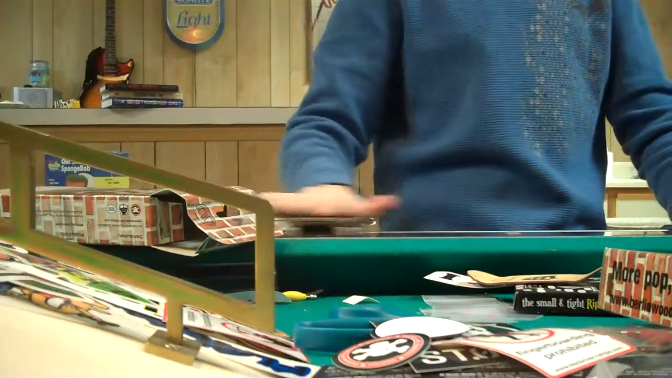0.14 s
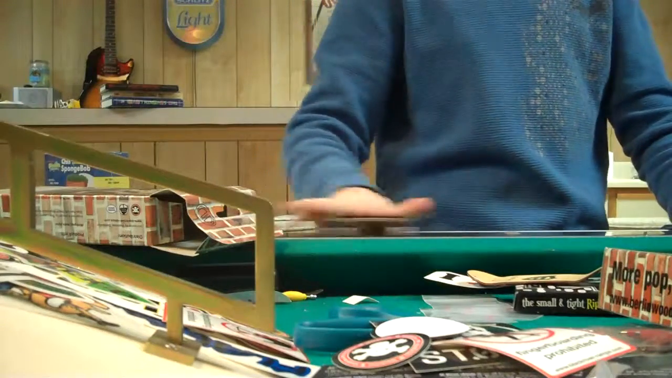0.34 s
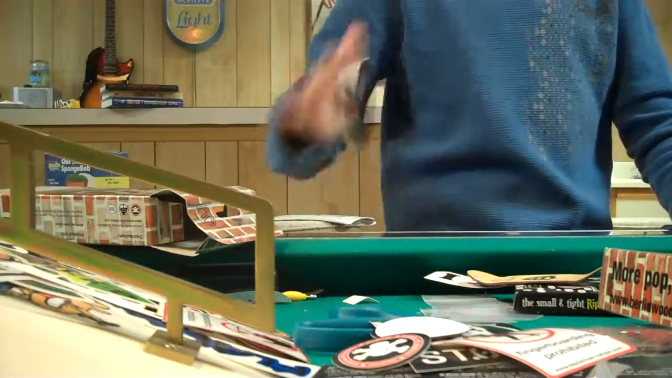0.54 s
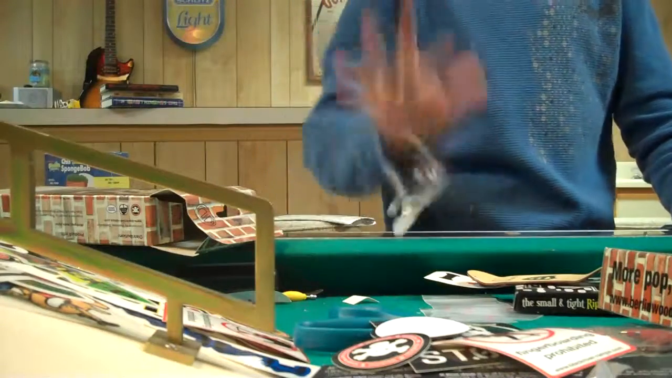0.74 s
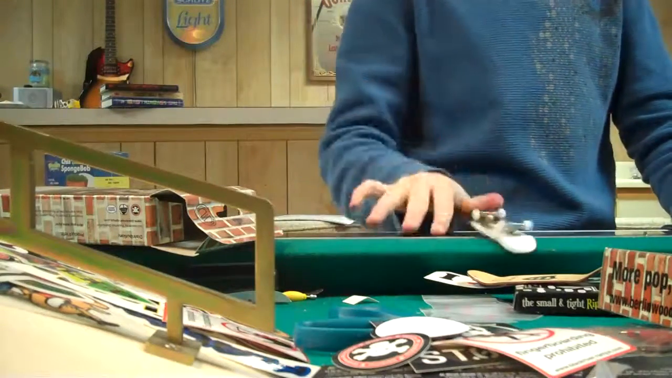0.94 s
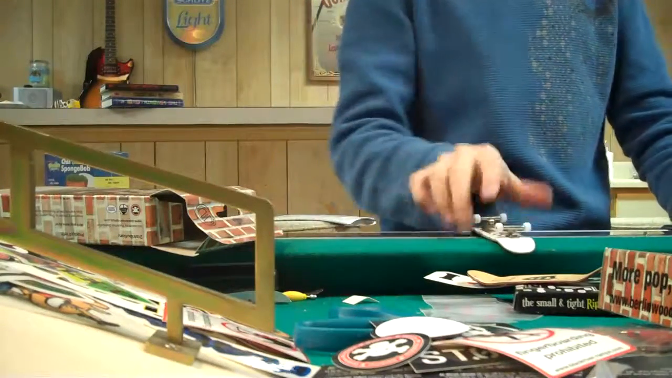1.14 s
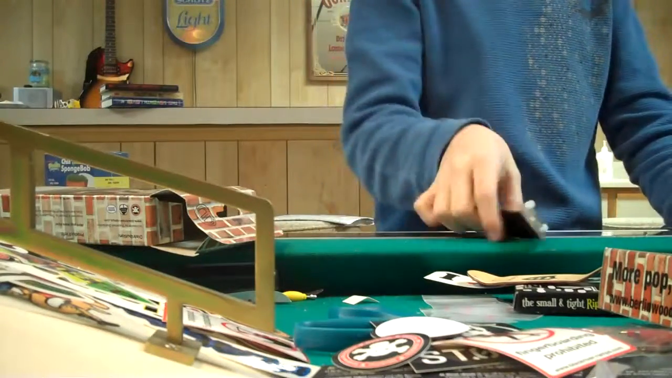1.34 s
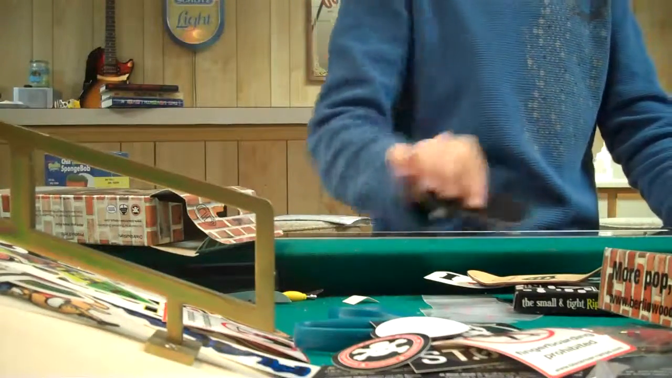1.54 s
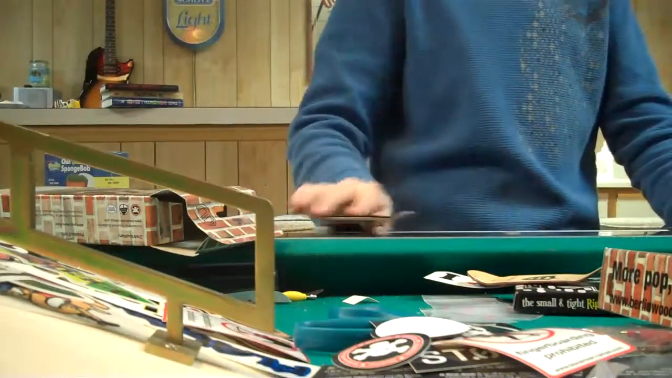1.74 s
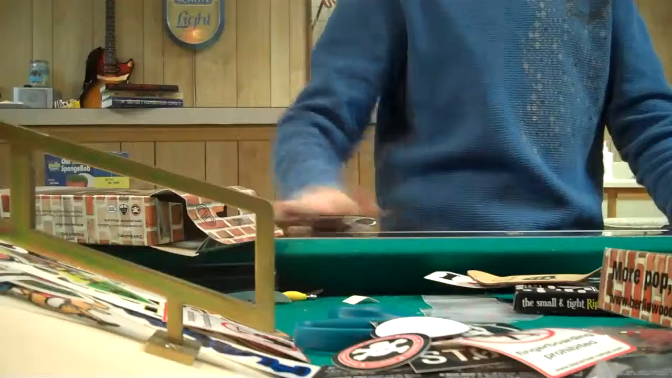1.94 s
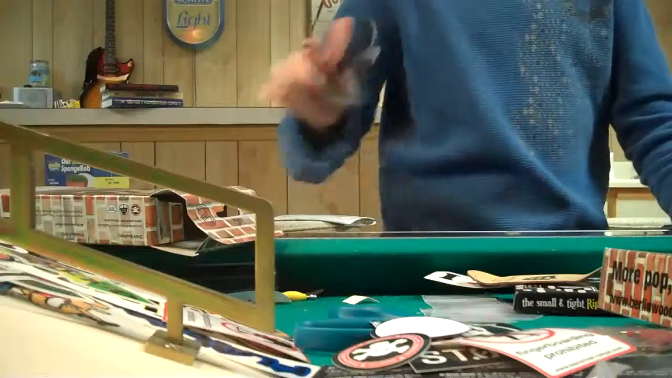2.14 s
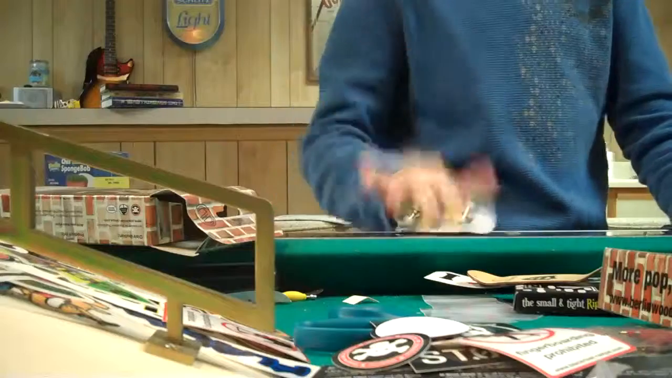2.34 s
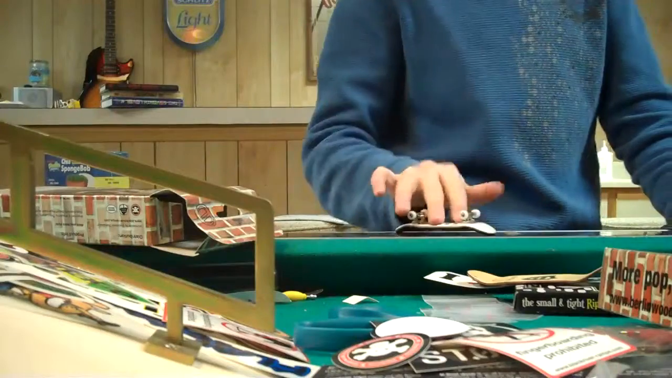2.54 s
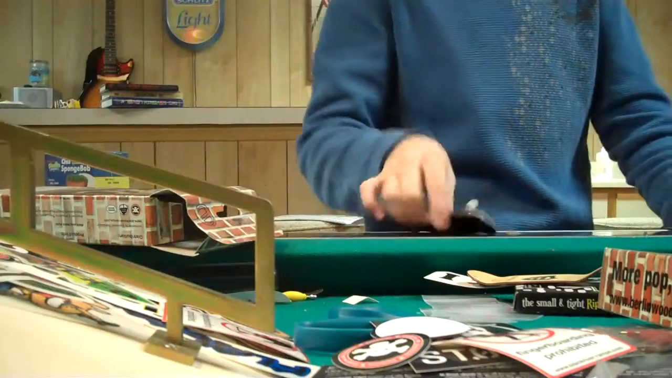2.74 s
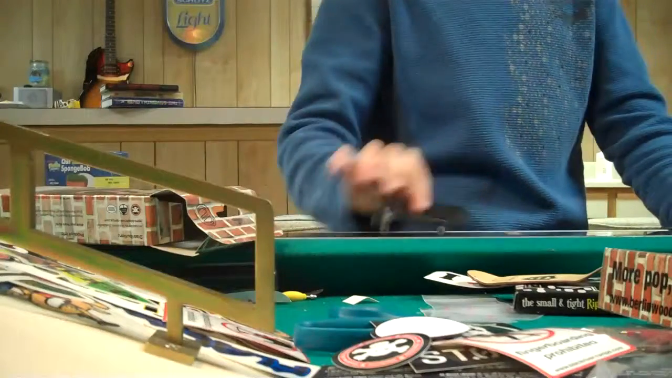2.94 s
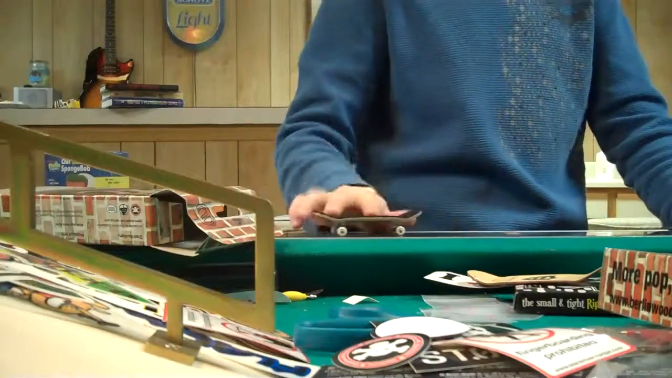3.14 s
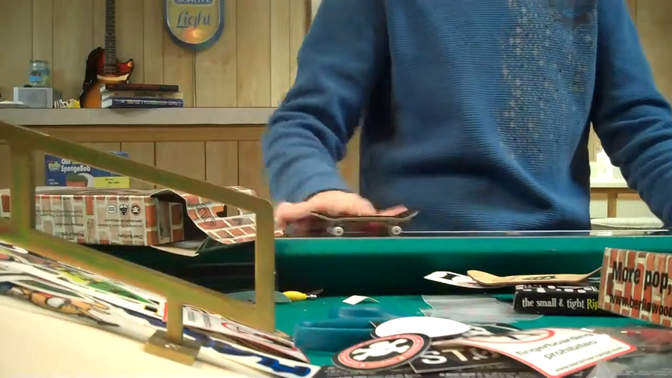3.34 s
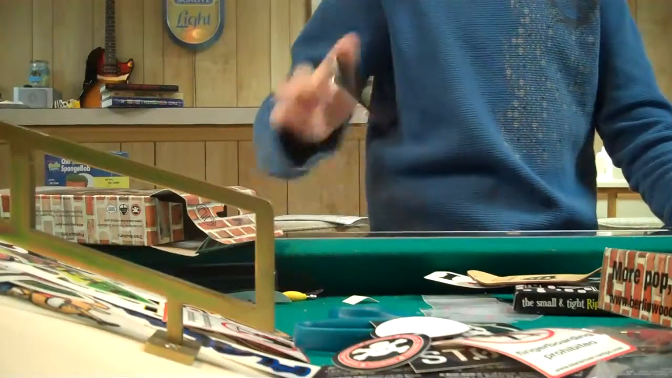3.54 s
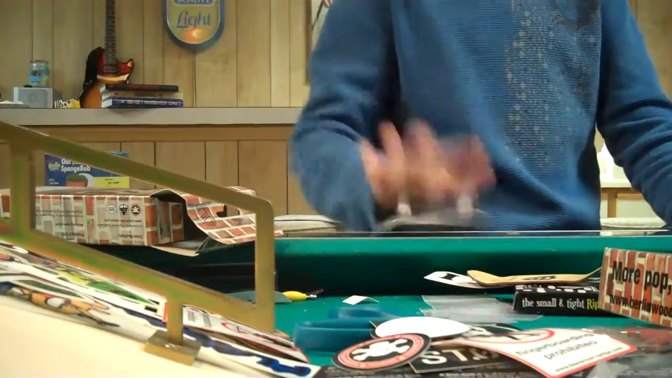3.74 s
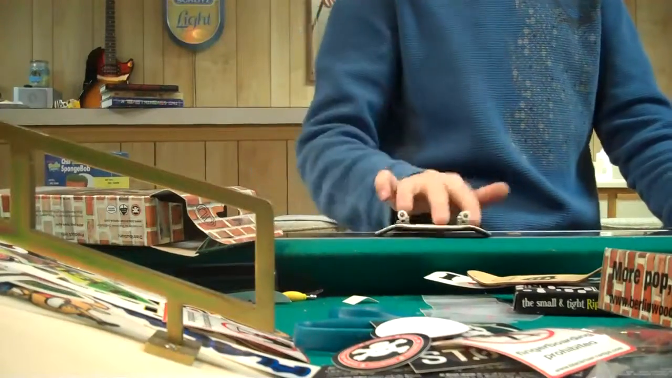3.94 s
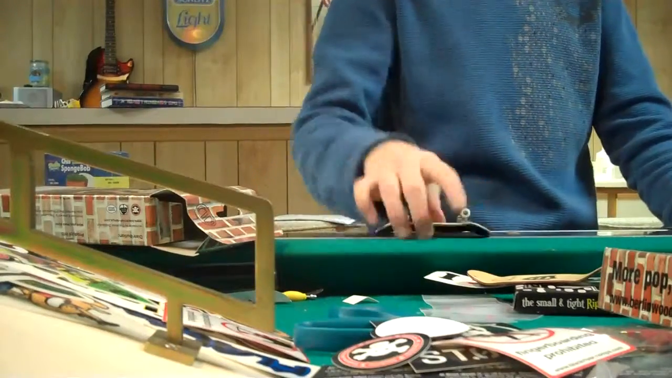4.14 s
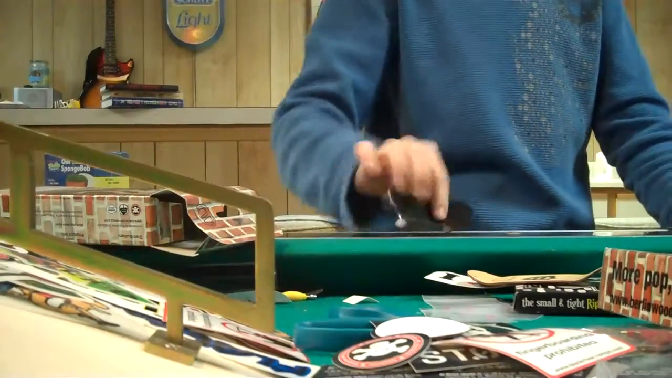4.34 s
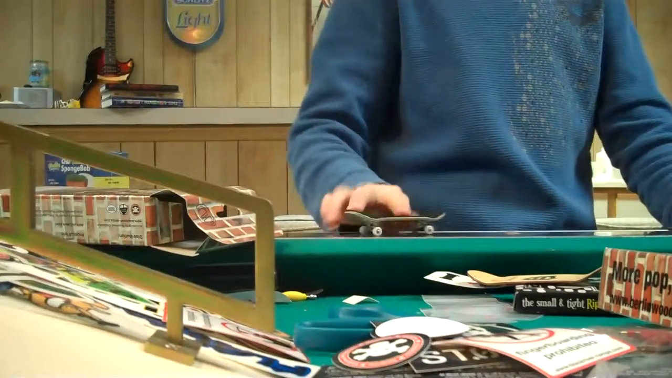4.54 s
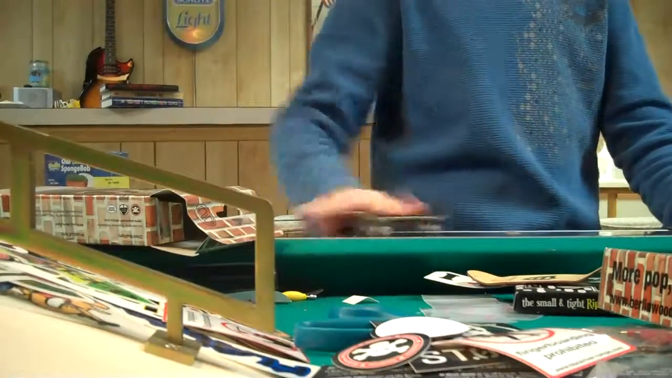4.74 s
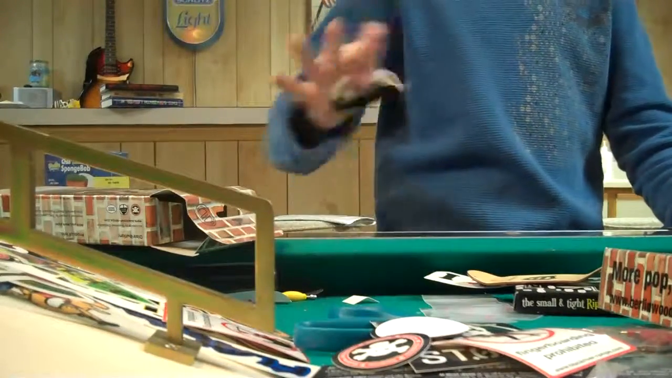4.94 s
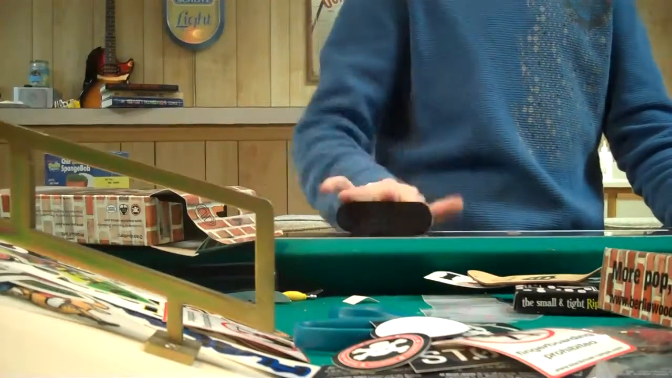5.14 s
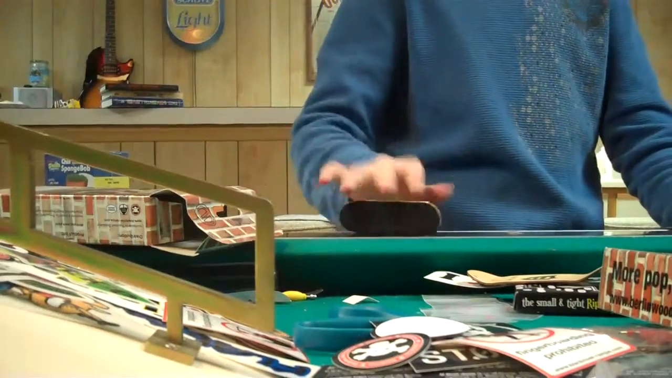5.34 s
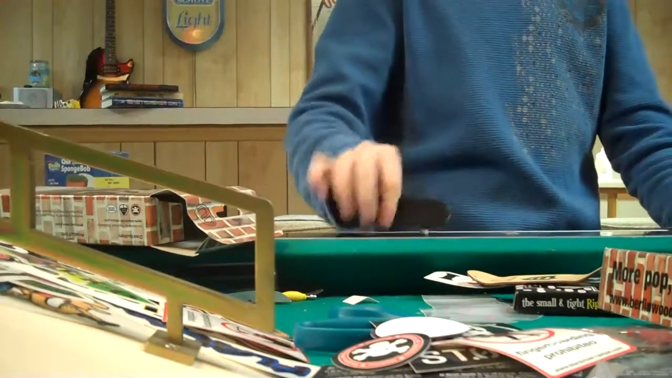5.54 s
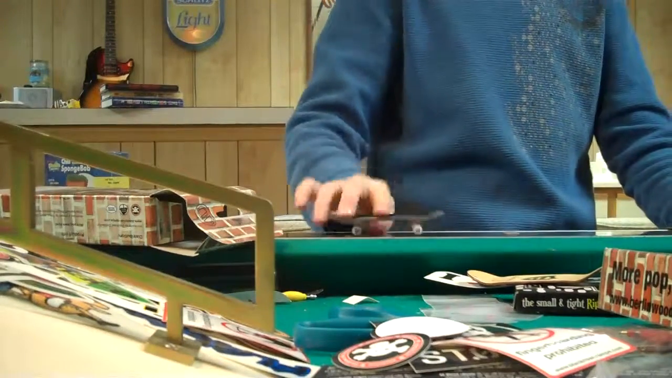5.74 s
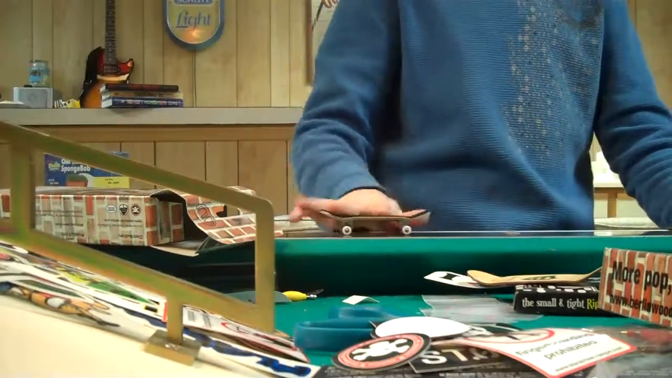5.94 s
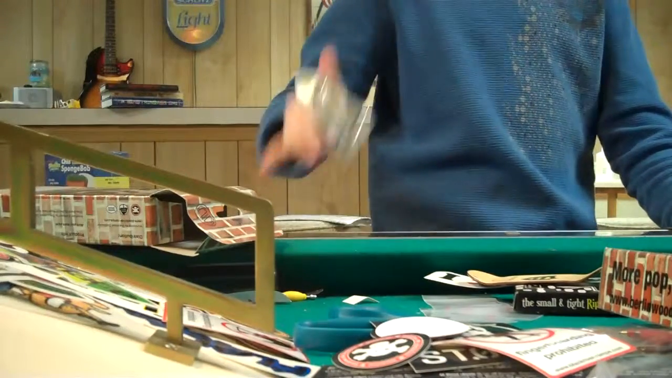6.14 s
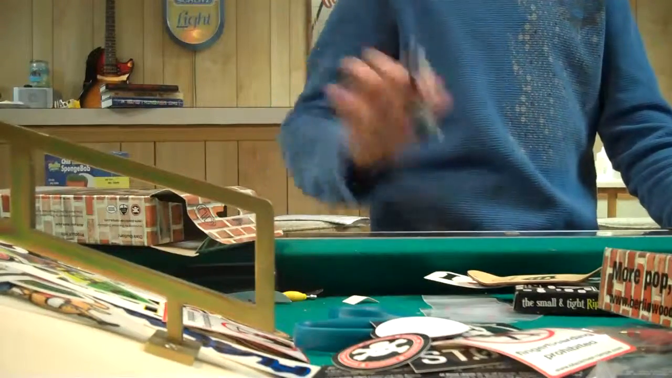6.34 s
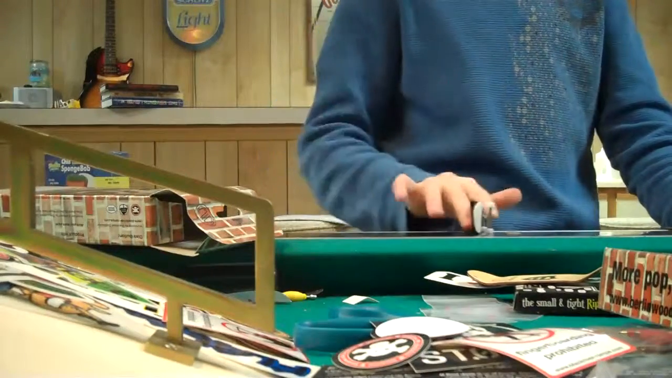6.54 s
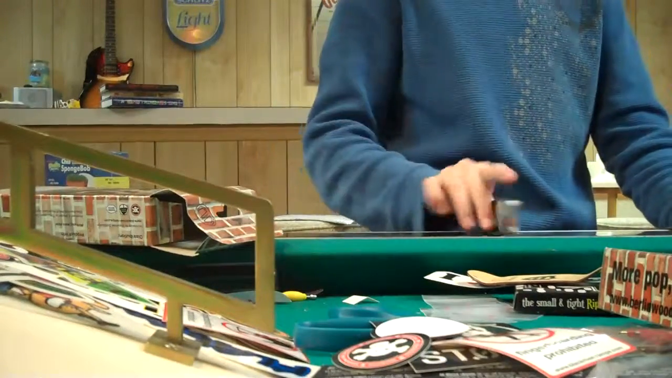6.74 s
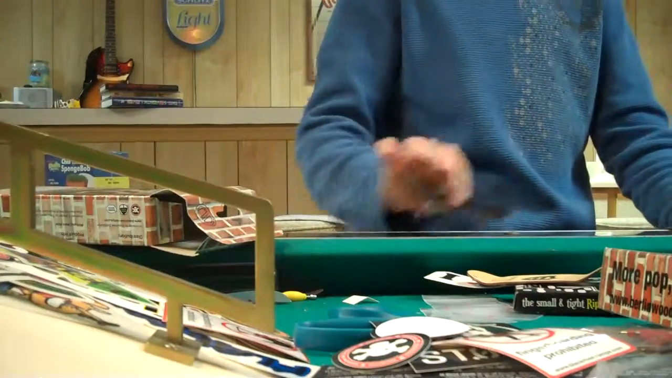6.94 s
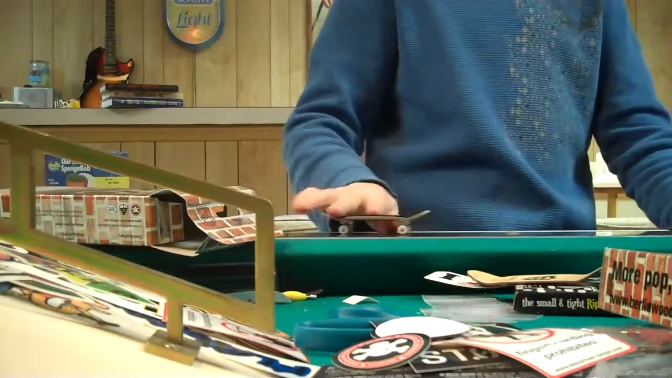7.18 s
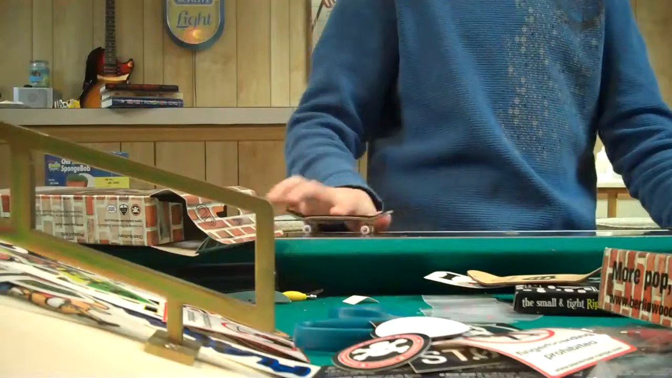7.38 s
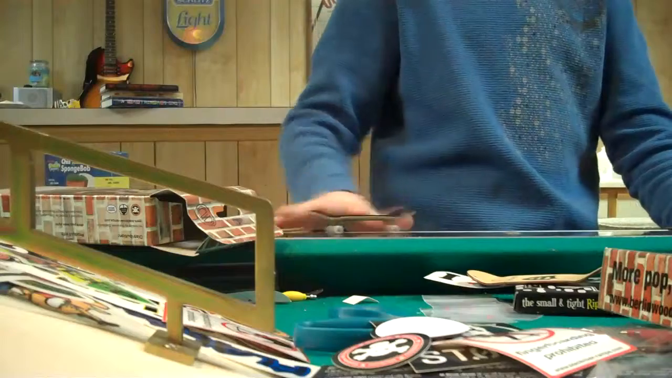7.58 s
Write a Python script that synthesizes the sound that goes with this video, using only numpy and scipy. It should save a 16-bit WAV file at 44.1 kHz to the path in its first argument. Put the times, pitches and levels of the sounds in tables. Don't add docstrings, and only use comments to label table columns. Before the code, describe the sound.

Small wheels rumble and rasp briefly on a table, then a sharp pop, a third of a second of silence, and a hard wooden tumble. The tiny board is righted with clustered clicks and popped again, five times in all, ending in soft rolling and ticks. Close, bright and thin in bass, with a quick wall slap, short room ring, overloaded peaks and low hiss.

```python
import sys
import numpy as np
from scipy import signal
from scipy.fft import rfft, irfft, next_fast_len
from scipy.io import wavfile
from scipy.ndimage import map_coordinates

SR = 44100
rng = np.random.default_rng(int(sys.argv[2]) if len(sys.argv) > 2 else 0)


def pcm_store(signal):
    levels = np.round(np.clip(np.atleast_2d(signal), -1, 1) * 32767)
    wavfile.write(sys.argv[1], SR, levels.astype(np.int16).T)


def makeup_ratio(level_db):
    decades = np.asarray(level_db, float) / 20
    return 10 ** decades


N = 335601

# pitch_hz, width_hz, level_db
TABLE_MODES = [(245, 12, -3.5), (543.3, 26, 4), (629, 140, 3.5), (721, 277, 0.5)]


def unit(x):
    return x / np.sqrt(np.mean(x ** 2) + 1e-20)


def peak(x, db):
    return makeup_ratio(db) * x / np.max(np.abs(x))


def along(points, hz):
    f, v = np.transpose(points)
    return np.interp(np.log(hz + 1), np.log(f + 1), v)


def filtered(x, response):
    m = next_fast_len(x.shape[-1] + 2048)
    spectrum = rfft(x, m) * response(np.fft.rfftfreq(m, 1 / SR))
    return irfft(spectrum, m)[..., :x.shape[-1]]


def resonances(modes):
    def response(f):
        total = 0
        for k, (hz, width_hz, db) in enumerate(modes):
            damping = 1j * f * width_hz
            total = total + (-1) ** k * makeup_ratio(db) * damping / (hz * hz - f * f + damping)
        return total
    return response


def wobble(rate_hz):
    knots = rng.standard_normal(int(N * rate_hz / SR) + 4)
    return map_coordinates(knots, [np.arange(N) * rate_hz / SR])


def contacts():
    # start_s, crack_db, crack_hz
    pops = [
        (0.5571, 0, 7000),
        (2.0883, 0, 7050),
        (3.5201, 0, 7000),
        (4.9016, -0.5, 5045),
        (6.1649, 1, 6930),
    ]
    # start_s, crack_db, crack_hz, deck_db, table_db
    falls = [(0.8654, -10.5, 6070, -10.5, -5), (0.8984, -4, 4070, -5.5, -21),
             (0.9055, -10.5, 5700, -20, -15), (0.9415, -1, 5940, -29, -17), (2.4077, 2.5, 3690, -13, -16.5),
             (2.4094, -4, 3735, -10, -14), (2.4523, 5, 7870, -5.5, -24.5), (2.4648, -14.5, 7840, -11, -4),
             (3.842, -8, 4210, -16, -7), (3.8503, -7, 4650, -12.5, -12.5), (3.8535, -9, 4030, -15.5, -13),
             (3.8907, -8.5, 3820, -18, -16), (3.8933, -9.5, 4550, -20, -14.5),
             (5.1859, 5, 7330, -20.5, -28.5), (5.1938, -4, 3770, -16, -21), (5.2074, -0.5, 6290, -1, -11.5),
             (5.216, -7, 3200, 1, -18), (5.2327, -17, 5210, -9, -19.5), (6.5211, 5.5, 5550, -6, -22),
             (6.5235, 0.5, 7200, -9.5, -22), (6.5307, 4.5, 3344, -4, -22.5)]
    # start_s, crack_db, crack_hz, deck_db
    wheels = [(1.6775, -11.5, 8100, -32), (1.697, -3.5, 7790, -30), (1.72, -4, 7160, -8),
              (2.9538, -15, 5800, -6), (3.0493, -3, 5490, -19), (3.0748, -7, 6260, -31),
              (3.0815, 4, 7260, -11.5), (4.349, -7, 5900, -8.5), (4.3511, -7.5, 3600, -8.5),
              (4.3809, -19.5, 5460, -3), (4.4574, -6, 5520, -8), (4.4866, -1, 6274, -11.5),
              (4.5268, -5, 3540, -5.5), (4.5364, -5.5, 6280, -34), (5.617, -16, 5090, -10),
              (5.7446, -11, 7580, -39), (5.789, -3, 7730, -18.5), (5.9803, -3, 7180, -19.5),
              (5.9814, -1.5, 7300, -15), (5.9822, -6.5, 3720, -8.5), (6.8151, -17.5, 7270, -10.5),
              (7.0682, -5.5, 6400, -17), (7.0884, -2, 7350, -22), (7.0945, -11, 6800, -35),
              (7.1019, -1, 3635, -9), (7.1045, -6.5, 6370, -12.5)]
    # start_s, crack_db, crack_hz, deck_db
    taps = [(0.3019, -21.5, 7100, 0.5), (0.3575, -28.5, 7500, 1), (0.398, -41, 3400, -16),
            (1.9236, -35.5, 3170, 6), (2.041, -30.5, 3560, -4.5), (3.2203, -44.5, 3506, 4),
            (3.4015, -24, 3690, 3), (4.7308, -33.5, 3630, 8.5), (5.4736, -26, 3230, -8),
            (5.4847, -24.5, 6430, -8), (5.5075, -33.5, 3830, -5), (5.8683, -28, 4070, -0.5),
            (6.6449, -26, 3870, 6.5), (6.7635, -29, 9200, -4), (6.7706, -31.5, 6400, -3),
            (6.7802, -33.5, 5300, -1.5), (6.7868, -34, 5870, -10), (6.8896, -30.5, 6220, -16.5),
            (7.4186, -39, 3430, 9), (7.447, -45, 3360, 17), (7.5189, -27, 3830, 4)]
    # start_s,
    # crack_db, crack_hz
    ticks = [(0.4636, -16, 6180), (1.033, -18, 6540), (1.092, -34, 5300), (1.3217, -40, 5500),
             (1.3582, -35, 5780), (1.482, -39.5, 5970), (2.935, -38.5, 5440), (4.227, -43, 3850),
             (4.2338, -33.5, 3940), (4.8658, -24, 5050), (5.1048, -33, 5860), (6.4204, -40.5, 6110),
             (6.4578, -49, 5850), (6.482, -52, 6000), (7.025, -47.5, 5700), (7.309, -52, 6800),
             (7.323, -50, 8500), (7.375, -45, 7600), (7.573, -49, 7700), (4.925, -12.5, 5200)]
    # start_s, crack_db, crack_hz
    pads = [
        (1.29, -44.5, 5540),
        (1.508, -55.5, 5500),
        (2.7913, -39, 3300),
    ]
    pop_db, tick_db, pad_db = (-18, -20.5, -28), (-31.5, -23.5, -28), (-11, 0, -12.5)
    wheel_db, tap_db = (-26, -16), (-13, -10)
    fall_knock_db, knock_per_deck = -7.5, 0.76
    rebound_s, rebound_db, rebound_hz = 0.0029, -7.5, 4540
    rows = [(*r, *pop_db) for r in pops]
    rows += [(s + rebound_s, db + rebound_db, rebound_hz, *tick_db) for s, db, _ in pops]
    rows += [(*r, *tick_db) for r in ticks]
    rows += [(*r, *pad_db) for r in pads]
    rows += [(*r, *wheel_db) for r in wheels]
    rows += [(*r, *tap_db) for r in taps]
    rows += [(*r, fall_knock_db + knock_per_deck * r[-2]) for r in falls]
    return sorted(rows)


def ring(modes, blow, detune):
    struck = [(hz * (1 + detune * rng.normal()), w, db + 3.2 * rng.normal()) for hz, w, db in modes]
    return filtered(blow, resonances(struck))


def clacks(count=4):
    # pitch_hz, width_hz, level_db
    deck_modes = [(859, 120, 2), (1031.4, 75, 6.5), (1346, 150, 3)]
    # pitch_hz, width_hz, level_db
    knock_modes = [(1620, 100, -4), (1952, 60, -1.5), (2460, 460, -5)]
    # freq_hz, density_db (per Hz)
    crack_colour = [(1470, -23), (2500, -20.5), (2950, -12), (3500, -2.5), (4360, -2.5), (6240, 0),
                    (7100, 1.5), (8400, -8), (9490, -11.5), (10400, -13.5), (15500, -25)]
    t = np.arange(3072) / SR
    size = len(t)
    f = np.fft.rfftfreq(size, 1 / SR)
    fade = np.hanning(size * 2)[size:]
    bodies = (deck_modes, TABLE_MODES, knock_modes)
    humps = [sum(makeup_ratio(2 * db) / (1 + ((f - hz) / (1.7 * w)) ** 2) ** 1.56 for hz, w, db in modes)
             for modes in bodies]
    direct, sends = np.zeros((2, N + size)), np.zeros((count, N + size))
    for k, (s, db, hz, deck_db, table_db, knock_db) in enumerate(contacts()):
        start = round(s * SR)
        noise = rng.standard_normal((3, size))
        noise[0, 4] += 5
        chatter_t60_s = 0.012 * makeup_ratio(0.092 * db)
        chatter = (noise[0] + 0.38 * noise[1:]) * makeup_ratio(-60 * t / chatter_t60_s)
        chatter *= 1 - np.exp(-t / 0.000048)
        tone = resonances([(hz, 700, 3.5 - 0.18 * db)])
        crack = filtered(chatter, lambda f: makeup_ratio(along(crack_colour, f)) * (1 + tone(f)))
        crack = peak(crack, db + 3.5)
        blow = (1 + 0.5 * rng.standard_normal(size)) * makeup_ratio(-60 * t / 0.0012)
        levels_db = db + np.array([deck_db, table_db + 3.5, knock_db + 6.0])
        rings = [peak(ring(modes, blow, 0.033), level) for modes, level in zip(bodies, levels_db)]
        direct[:, start:start + size] += crack + sum(rings)
        crack_hump = (makeup_ratio(along(crack_colour, f)) * np.abs(1 + tone(f))) ** 2
        parts = zip(rings + [crack[0]], humps + [crack_hump])
        power = sum(np.sum(x ** 2) * p / p.mean() for x, p in parts)
        radiated = np.roll(irfft(np.sqrt(power)), 150) * fade
        sends[k % count, start:start + size] += makeup_ratio(0.024 * db) * radiated
    return direct[:, :N], sends[:, :N]


def strokes():
    # start_s, length_s, hum_db, grit_over_hum_db, hum_hz
    pushes = [(-0.07, 0.18, -30, 2.5, 1116), (0.115, .16, -27.5, -3, 1150), (0.19, .15, -34.5, 2.5, 1144),
              (0.07, .08, -42, -4, 1000), (0.3, .07, -41, -3, 1050), (0.35, .06, -34, -4, 1100),
              (0.375, 0.14, -26.5, -1.5, 1147), (0.5, 0.057, -35, 1, 1125), (3.19, .15, -48, -19, 1232),
              (4.59, .135, -37, -16, 1171), (4.797, .066, -31, -3, 1000), (5.47, 0.043, -30, -8, 1213),
              (5.89, 0.12, -43.5, -18.5, 1077), (7.19, .07, -40.5, -26, 1000),
              (7.27, 0.092, -39, -10, 1203), (7.33, .07, -38, -11, 1084), (7.42, 0.053, -41, -15, 1050),
              (7.555, 0.1, -42, -8, 1096)]
    # start_s, length_s, hum_db, grit_over_hum_db, hum_hz
    coasts = [(1.69, 0.2, -32, -1.5, 1081), (2.785, .12, -61.5, 1.5, 950), (3.1, .12, -34, -2.5, 1090),
              (3.398, 0.056, -45.5, -0.5, 1072), (4.54, 0.082, -35.5, 2.5, 1110),
              (5.8, 0.08, -52.5, 14, 1210), (5.99, .11, -49, 9.5, 1096), (6.762, 0.031, -29.5, -17.5, 1036),
              (6.81, 0.065, -33.5, -13.5, 1020), (6.886, 0.052, -47.5, -19, 1020),
              (7.11, 0.14, -39, 0.5, 1074), (7.516, 0.034, -42, -6, 1040)]
    # start_s, length_s, hum_db, grit_over_hum_db, hum_hz
    runs = [
        (1.955, 0.1, -55.5, 14, 1092),
        (2.015, .073, -31, -7, 1094),
        (3.45, .068, -33.5, -8.5, 1210),
        (4.845, 0.067, -31.5, -11.5, 1254),
        (6.085, 0.073, -33, -4, 1092),
    ]
    # start_s, length_s, hum_db, grit_over_hum_db, hum_hz
    slides = [
        (1.3, 0.15, -86.5, 25, 1100),
        (1.46, 0.069, -67, 8.6, 1092),
        (2.91, .045, -63, 7.5, 1016),
        (4.15, 0.2, -81, 18, 1019),
        (4.325, .03, -57.5, 4.1, 1044),
        (4.848, 0.045, -50.5, 18, 1212),
        (5.0, 0.11, -83, 12, 1204),
        (6.88, 0.045, -65.5, 12, 1018),
    ]
    # strokes, speed_peak (0-1 of stroke), rumble_over_hum_db, squeak_hz, squeak_over_grit_db
    kinds = ((pushes, 0.5, -11, 3700.5, -18), (coasts, 0.73, -7.5, 5298.5, -10.5),
             (runs, 1.05, -15.5, 2848, -15.5), (slides, 0.55, 0.5, 7199.5, -2))
    hum_power, grit_power, rumble_power = 1.3, 1.19, 0.91
    t = np.arange(N) / SR
    levels, pitches = np.zeros((4, N)), []
    for rows, top, rumble_db, squeak_hz, squeak_db in kinds:
        for s, length, db, grit_db, hum_hz in rows:
            on = slice(max(round(s * SR), 0), round((s + length) * SR))
            phase = np.interp(t[on], [s, s + top * length, s + length], [0, 1, 2])
            speed = np.abs(np.sin(np.pi / 2 * phase))
            hum = makeup_ratio(db) * speed ** hum_power
            rumble = makeup_ratio(db + rumble_db) * speed ** rumble_power
            grit = makeup_ratio(db + grit_db) * speed ** grit_power
            levels[:, on] += [hum, rumble, grit, makeup_ratio(squeak_db) * grit]
            pitches += [(s + length * part, hum_hz, squeak_hz) for part in (1 / 4, 3 / 4)]
    s, hum_hz, squeak_hz = np.transpose(sorted(pitches))
    return levels, np.interp(t, s, hum_hz), np.interp(t, s, squeak_hz)


def narrow(hz, width_hz, grains):
    slow = filtered(grains, lambda f: 1 / (1 + (2 * f / width_hz) ** 2))
    turn = 2 * np.pi * np.cumsum(hz) / SR
    return unit(slow[0] * np.cos(turn) + slow[1] * np.sin(turn))


def rolling():
    # freq_hz, density_db (per Hz)
    grit_colour = [(880, -17.5), (1500, -6.5), (2080, -5), (2860, -9.5), (3340, -6.5), (4680, -10.5),
                   (6300, -5.5), (9000, -23.5), (13600, -39), (14600, -43.5), (15000, -79)]
    (hum_on, rumble_on, hiss_on, squeak_on), hum_hz, squeak_hz = strokes()
    blobs = makeup_ratio(2.5 * wobble(40))
    bumps = makeup_ratio(1.3 * wobble(60) + 2.0 * wobble(280))
    grains = rng.standard_normal((8, N)) * bumps
    hum = narrow(hum_hz * (1 + 0.03 * wobble(25)), 260, grains[4:6] * blobs)
    rumble = filtered(grains[1], lambda f: resonances(TABLE_MODES)(f) * (1j * f / (400 + 1j * f)) ** 2)
    hiss = filtered(grains[0] + 0.087 * grains[2:4], lambda f: makeup_ratio(along(grit_colour, f)))
    squeak = narrow(squeak_hz * (1 + 0.077 * wobble(15)), 360, grains[6:])
    body = hum_on * hum + rumble_on * unit(rumble)
    treble = hiss_on * unit(hiss) + squeak_on * squeak
    return makeup_ratio(-3.0) * body + makeup_ratio(-2.02) * treble


def deck_notes():
    # start_s, peak_db, pitch_hz
    free_rings = [(0.302, -34.5, 1145), (3.212, -24.5, 1235), (3.267, -38, 1196), (3.512, -27, 1200),
                  (4.61, -35, 1145), (4.624, -35, 1160), (4.682, -33.5, 1115), (6.766, -18, 1015),
                  (6.8147, -15.5, 1023), (6.887, -28, 1010), (7.102, -11, 1008), (0.899, -14, 1000),
                  (2.454, -10, 985), (4.536, -20, 1050), (6.523, -10, 960), (7.324, -31, 1003),
                  (7.348, -40, 1160), (7.445, -27, 1060), (7.52, -23, 1052)]
    # start_s, peak_db, pitch_hz
    crumbs = [(0.019, -25.5, 1320), (0.151, -31, 1090), (0.173, -28.5, 1190), (0.235, -27.5, 1100),
              (0.265, -28, 1150), (0.41, -27, 1150), (0.448, -23, 1120), (0.478, -28, 1150),
              (7.3, -36, 1250), (7.358, -33, 1100), (7.421, -31, 1000), (7.6, -32, 1100),
              (0.042, -29.5, 1090), (0.188, -29, 1250), (0.21, -26.5, 1130), (0.394, -25, 1090),
              (0.435, -25, 1120), (0.462, -27.5, 1150), (2.03, -31, 1130), (2.05, -30, 1080),
              (4.812, -30, 900), (4.831, -27.5, 1200), (6.11, -33.5, 1150), (6.128, -31.5, 1060),
              (7.385, -30, 1150), (7.59, -34, 1100)]
    attack_s, free_t60_s, crumb_t60_s = 0.0022, 0.05, 0.039
    t, out = np.arange(SR // 8) / SR, np.zeros(N + SR)
    for rows, t60_s in ((free_rings, free_t60_s), (crumbs, crumb_t60_s)):
        for s, db, hz in rows:
            envelope = makeup_ratio(db - 60 * t / t60_s) * (1 - np.exp(-t / attack_s))
            out[round(s * SR):][:len(t)] += envelope * np.sin(2 * np.pi * hz * t)
    return out[:N]


def rasps():
    # start_s, length_s, level_db, pitch_hz, width_hz
    swells = [(0.38, .11, -33, 1130, 260), (0.17, .11, -35, 1150, 300), (0.03, .07, -36, 620, 250),
              (6.811, .012, -36, 5500, 700), (6.76, .17, -54, 285, 60), (4.6, .045, -40, 1200, 350),
              (4.665, .04, -41, 1200, 300), (3.2, .09, -44, 1230, 250), (3.845, .09, -52, 150, 80),
              (1.69, .1, -52, 220, 80), (0.175, .08, -38.5, 6300, 900), (0.394, .08, -40, 3700, 400),
              (0.43, .05, -38.5, 6200, 900), (1.978, .085, -43.5, 2800, 501), (1.984, .06, -47, 3500, 500),
              (2.037, .045, -43, 2300, 500), (2.033, .03, -45.5, 7000, 1800), (3.407, .06, -54, 3600, 300),
              (3.465, .05, -44.5, 3300, 1200), (4.815, .04, -46, 3750, 300), (4.821, .025, -38, 5800, 1800),
              (4.844, .045, -34.5, 5000, 700), (6.092, .055, -42.5, 3500, 500),
              (6.775, .03, -47.5, 5900, 1800), (6.813, .07, -48.5, 6500, 2500),
              (6.881, .05, -42.5, 6000, 1800), (7.435, .03, -58, 7400, 1200)]
    out = np.zeros(N)
    grains = rng.standard_normal(N) * makeup_ratio(3.2 * wobble(150))
    for s, length, db, hz, width_hz in swells:
        on = slice(round(s * SR), round((s + length) * SR))
        mode = resonances([(hz, width_hz, 0)])
        band = unit(filtered(grains[on], lambda f: mode(f) ** 2))
        out[on] += makeup_ratio(db) * band * np.sqrt(np.hanning(len(band)))
    return out


def thumps():
    # start_s, level_db, left_share, right_share
    blows = [
        (0.868, -40.5, .7, 0.52),
        (2.408, -21.5, -1, -.3),
        (2.455, -30.5, -1, 0.23),
        (3.081, -39.5, 1, .4),
        (3.845, -41, .7, .7),
        (5.208, -41.5, .7, -.3),
        (6.522, -28.5, -.6, 1),
        (6.531, -35, .8, -.3),
    ]
    shove_s = 0.0019
    t, out = np.arange(2048) / SR / shove_s, np.zeros((2, N))
    push = t * np.exp(1 - t) * (1 - 0.25 * t)
    for s, db, left, right in blows:
        out[:, round(s * SR):][:, :len(t)] += makeup_ratio(db) * np.outer([left, right], push)
    return out


def walls(x):
    # delay_s, left_lag_s, level_db
    echoes = [
        (.0072, 0.000091, -10.5),
        (0.0124, 0.013, -33),
        (0.017, 0.026, -18),
        (0.023, 0.034, -18),
    ]
    side = np.array([[0.5], [-0.5]])

    def response(f):
        paths = sum(makeup_ratio(db) * np.exp(-2j * np.pi * f * (s + side * lag)) for s, lag, db in echoes)
        return 1 + paths / (1 + (f / 11000) ** 6)
    return filtered(x, response)


def diffuse(pair):
    # freq_hz, left_right_likeness (0-1)
    likeness = [(60, 0.3), (300, 0.94), (700, 0.93), (1500, 0.54), (3000, 0.056), (7000, .05)]

    def blend(f):
        turn = np.arccos(np.clip(along(likeness, f), -1, 1)) / 2
        return np.array([np.cos(turn), np.sin(turn)])
    mid, side = filtered(pair, blend)
    return np.array([mid + side, mid - side])


def room(x):
    # freq_hz, t60_s
    decay = [(150, 0.54), (500, 0.25), (1000, 0.29), (3000, 0.28), (7000, 0.23), (12000, 0.22)]
    # freq_hz, level_db
    colour = [(150, 1), (380, 3.5), (520, 7), (1000, -2.5), (3000, 5.5), (7000, 1), (12000, -4),
              (14200, -2.5), (14500, -29.5)]
    hz, t, z = signal.stft(rng.standard_normal((2, SR * 3 // 5)), SR, nperseg=256)
    z = z * makeup_ratio(along(colour, hz)[:, None])
    fall_db = -60 * t / along(decay, hz)[:, None]
    z = z * (makeup_ratio(fall_db) + makeup_ratio(-21.0 + 0.4 * fall_db))
    tail = diffuse(signal.istft(z, SR, nperseg=256)[1])
    tail = tail * np.clip(np.arange(tail.shape[1]) / SR / 0.001, 0, 1)
    tail = makeup_ratio(-8.0) * tail / np.linalg.norm(tail[0])
    return signal.fftconvolve(x[None], tail, axes=1)[:, :N]


def hush():
    # freq_hz, density_db (per Hz)
    colour = [(15, -42), (25, -8), (65, -23), (140, -2), (319, -8), (604, -4.5), (853, -13), (1700, -8),
              (2050, -13), (3770, -13), (7120, -13), (9290, -17), (14200, -17.5)]
    level_db, top_hz = -62.5, 14150
    noise = filtered(rng.standard_normal((2, N)), lambda f: makeup_ratio(along(colour, f)) * (f < top_hz))
    return makeup_ratio(level_db + 0.7 * wobble(24)) * unit(diffuse(noise))


def scene():
    wheels = rolling() + deck_notes() + rasps()
    direct, sends = clacks()
    sends[0] += makeup_ratio(-1.5) * wheels.mean(axis=0)
    near = walls(direct + wheels) + sum(room(send) for send in sends)
    return filtered(near, lambda f: 1j * f / (450 + 1j * f)) + hush() + thumps()


def roll_off(x):
    return signal.sosfilt(signal.butter(12, 15000, fs=SR, output="sos"), x)


def record(dry):
    # freq_hz, left_minus_right_db
    port_colour = [(60, 2.5), (200, 1), (700, -1.5), (2380, 0), (4400, -2), (6400, -5.5), (7400, 11.5),
                   (8600, 8.5), (15000, 6.5)]
    air_hz, air_db, lag_samples = 14300, -6, 1.29
    side = np.array([[0.5], [-0.5]])

    def response(f):
        colour = makeup_ratio(side * along(port_colour, f) + air_db * (f > air_hz))
        return colour * np.exp(-2j * np.pi * f * side * lag_samples / SR)
    ports = filtered(dry, response)
    clipped = ports / (1 + np.abs(ports / 0.99) ** 12) ** (1 / 12)
    return roll_off(clipped)


dry = scene()
out = record(dry)
pcm_store(out)
```